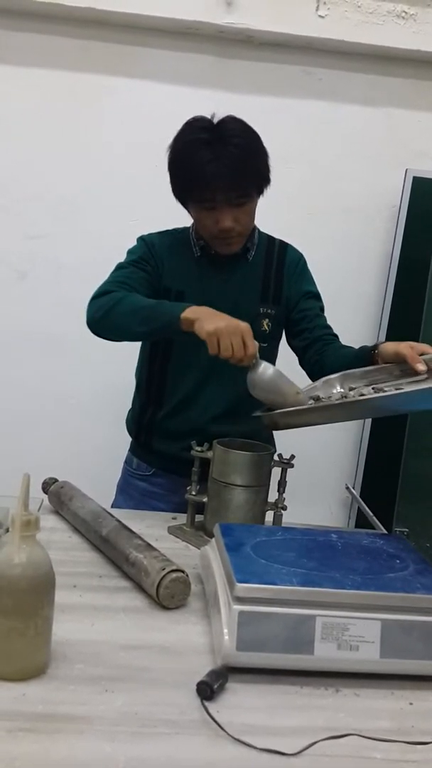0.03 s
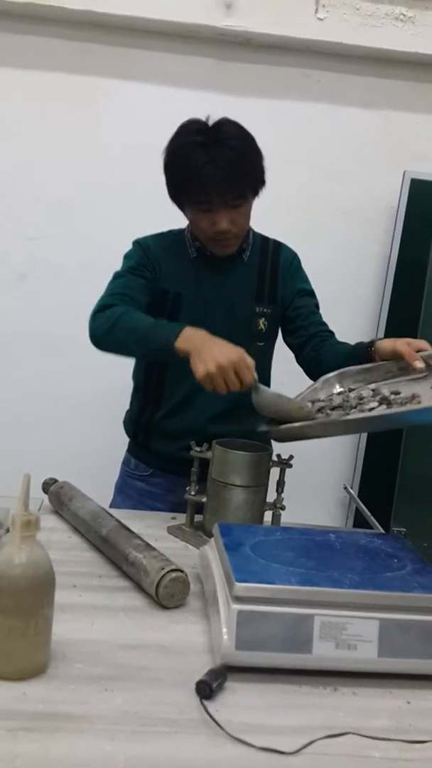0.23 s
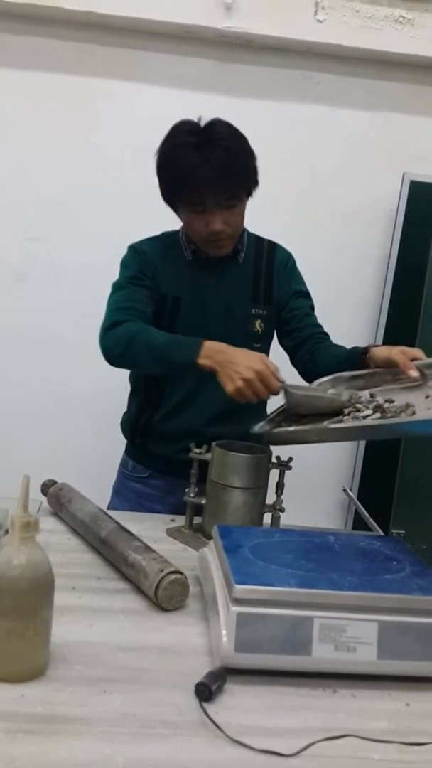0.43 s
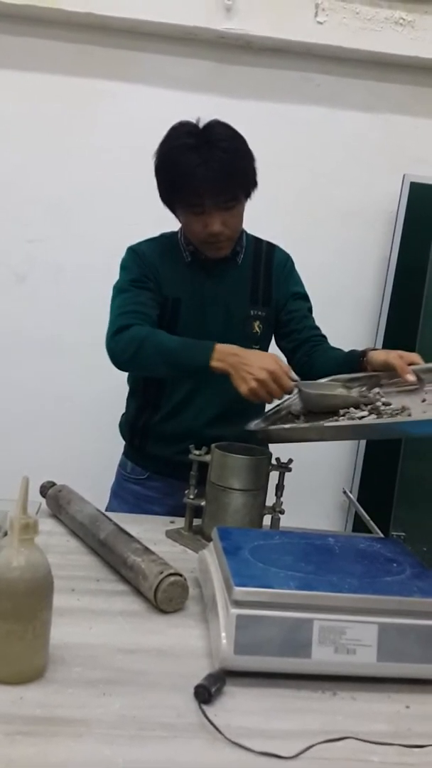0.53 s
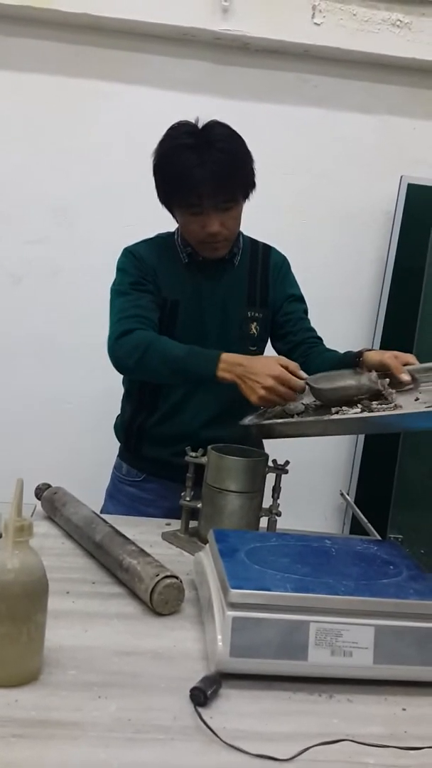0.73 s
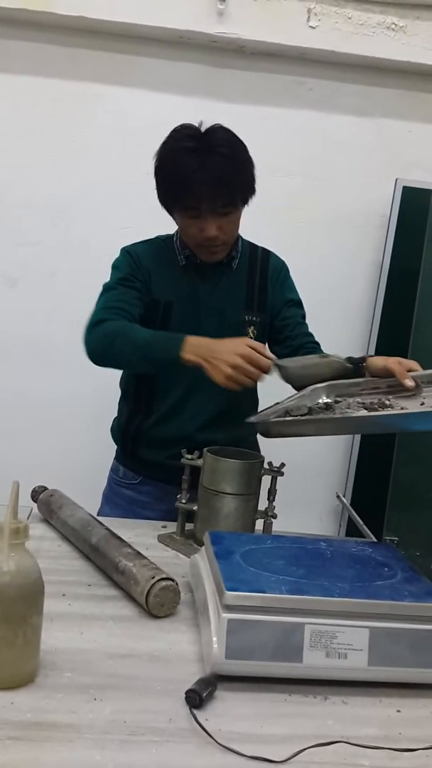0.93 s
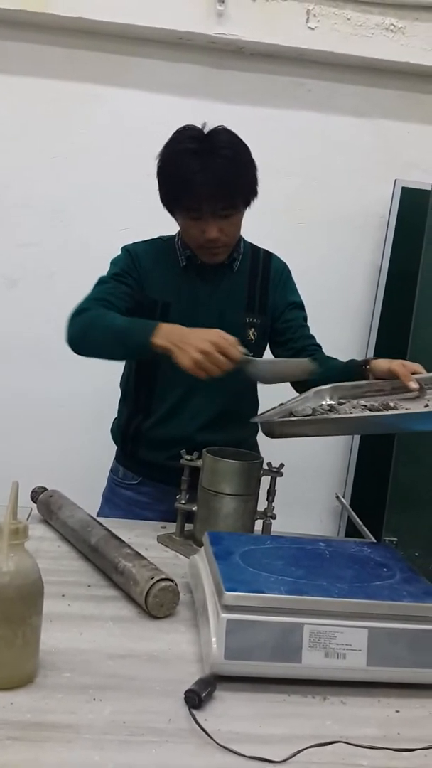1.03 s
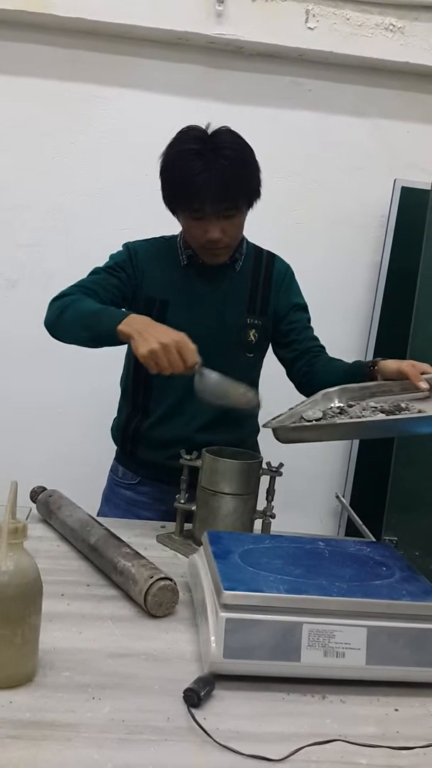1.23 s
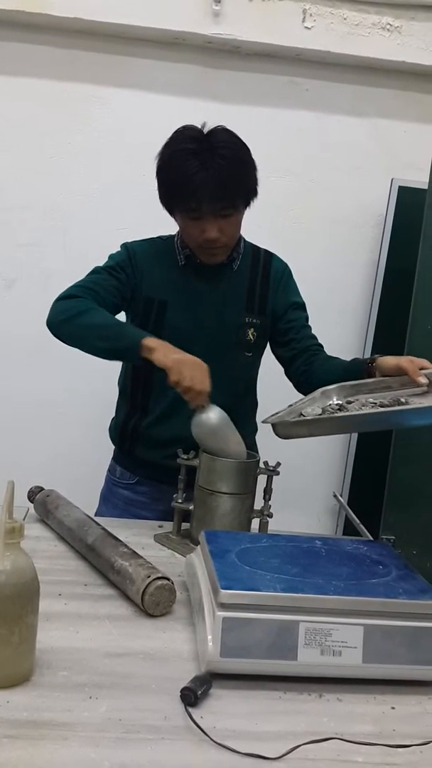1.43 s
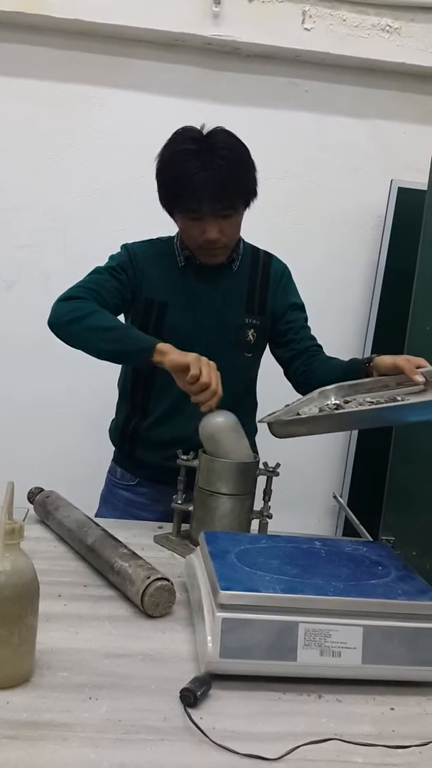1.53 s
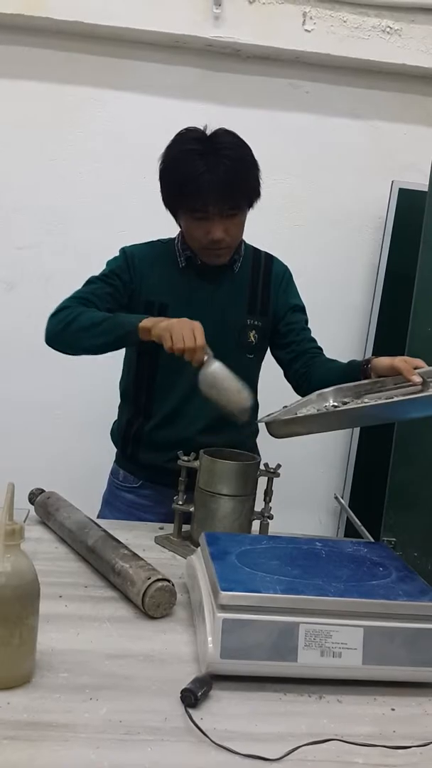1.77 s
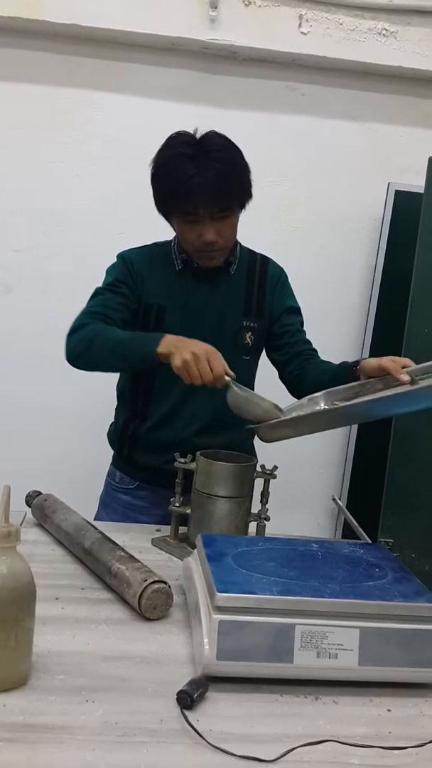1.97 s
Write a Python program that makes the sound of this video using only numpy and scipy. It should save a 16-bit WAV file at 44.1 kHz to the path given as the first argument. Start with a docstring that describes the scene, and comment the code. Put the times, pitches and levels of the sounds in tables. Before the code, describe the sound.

A metal scoop scrapes through gritty soil on a sheet-metal tray, clinking against pebbles. It then taps a steel mold and knocks on it, leaving a brief ring as soil patters in. The bare room echoes and ventilation hums faintly.

```python
"""A bare, ringing laboratory: a metal scoop is pushed through gritty soil on a sheet-metal tray.
Grinding grit and clinking pebbles excite the blade's resonances, and the tray rumbles under the load.
The scoop taps the rim of a steel mould, then knocks on it, leaving its modes ringing as soil
patters in. Ventilation hums faintly."""
import sys
import numpy as np
from scipy import signal
from scipy.fft import rfft, irfft
from scipy.io import wavfile

SR = 44100
rng = np.random.default_rng(int(sys.argv[2]) if len(sys.argv) > 2 else 0)


def store_pcm(level_fs):
    """Save levels as 16-bit WAV."""
    pcm = np.round(np.clip(level_fs, -1, 1) * 32767).astype(np.int16)
    wavfile.write(sys.argv[1], SR, np.atleast_2d(pcm).T)


N = 88200
T = np.arange(N) / SR
HZ = np.maximum(np.arange(N // 2 + 1) * SR / N, 1)
KNOCK_S, RISE_S = 1.616, 0.00062


def scoop():
    """Grinding and clinks ring the blade; the shifting load of soil detunes its resonances."""
    # Each row: time in seconds, grinding level in dB.
    grind_db = [(0, -65.5), (.2, -39), (.345, -58), (.365, -38.5), (.42, -36), (.475, -28.5), (.572, -33),
                (.607, -25.5), (.68, -34), (.76, -33), (.83, -39), (.94, -42.5), (1.04, -40.5),
                (1.13, -41.5), (1.3, -55.5), (1.42, -62), (1.55, -49), (2, -66)]
    # Each row: frequency in Hz, grit level in dB.
    grit_spectrum = [(200, -35), (700, -9), (1400, -6.5), (3000, 0.5), (5000, 2.5), (7000, 2.5), (9500, -5),
                     (12000, -18), (16000, -14)]
    # Hits on pebbles, tray and rim. Each row: start in seconds, level in dB, decay in seconds,
    # low and high edge in Hz.
    clinks = [(0.0814, -27, 0.0033, 1180, 11100), (.18, -34.5, 0.012, 3000, 9900),
              (0.2159, -19.5, 0.0045, 2530, 9600), (0.232, -30, 0.0072, 670, 8000),
              (.407, -34, 0.0044, 2500, 9700), (0.438, -35.5, 0.012, 1500, 3000),
              (0.457, -30, 0.0049, 2480, 13000), (0.48, -38.5, 0.003, 1040, 1460),
              (0.495, -23, 0.0024, 4030, 12000), (.547, -22, 0.003, 970, 9300),
              (0.568, -29, 0.0027, 2000, 8000), (0.5845, -18.5, 0.005, 2600, 10100),
              (.591, -20, 0.0065, 2280, 8000), (0.648, -18, 0.0095, 2200, 9400),
              (0.654, -14.5, 0.0048, 1750, 8100), (0.687, -18, 0.0051, 3460, 7850),
              (.711, -13.5, 0.0043, 2190, 9100), (0.72, -18.5, 0.0062, 1470, 7240),
              (0.734, -17.5, 0.0077, 2900, 8100), (.749, -20.5, 0.01, 1000, 5800),
              (.787, -24.5, 0.0056, 1990, 7860), (.9345, -22, 0.0011, 1380, 5500),
              (0.9616, -13, 0.002, 3100, 8000), (1.0052, -11, 0.00085, 3800, 10000),
              (1.024, -25, 0.0044, 3340, 8100), (1.0305, -17, 0.0037, 4200, 6750),
              (1.054, -22, 0.0045, 4100, 9300), (1.3554, -16, 0.0031, 2480, 9700),
              (1.425, -21.5, 0.0029, 5300, 15950), (1.7083, -24, 0.0038, 3850, 7800),
              (1.76, -35, 0.0019, 3500, 9100), (1.856, -43, 0.0011, 3860, 6600)]
    # Each row: frequency in Hz, gain in dB, T60 in seconds.
    blade_modes = [(1304, 5, 0.016), (1808, 6.5, 0.26), (2775, -13.5, 0.11), (4600, -0.5, 0.062),
                   (4835, -4, 0.042), (6690, 6.5, 0.021), (7100, 5.5, 0.033), (9750, 7, 0.042)]
    crunch_db, detune_share = 4.4, 0.013
    catch_and_slip = from_db(crunch_db * waver(per_s=70))
    grind = level(grind_db) * rms_one(catch_and_slip * colour(grains(), grit_spectrum))
    drive = grind + from_db(0.5) * sum(contact(*row) for row in clinks)
    ring = sum(from_db(db) * resonate(drive, hz * (1 + detune_share * waver(per_s=22)), t60_s)
               for hz, db, t60_s in blade_modes)
    return drive + ring


def pings():
    """The blade rings briefly where it catches a pebble or bounces on the rim."""
    # Each row: start in seconds, frequency in Hz, level in dB, T60 in seconds.
    catches = [(0.215, 4360, -17.5, 0.022), (0.218, 4850, -13.5, 0.017), (.439, 1365, -32.5, .07),
               (.466, 2810, -34, 0.14), (.483, 6040, -13.5, 0.025), (.509, 4665, -18, 0.029),
               (.689, 6100, -24, 0.02), (1.71, 3350, -25.5, 0.032)]
    return sum(modes(start_s, [mode]) for start_s, *mode in catches)


def sand():
    """Fine sand crackles as the blade digs in."""
    return from_db(-37.5) * swell(peak_s=0.506, spread_s=0.046) * rms_one(band(grains(), 6000, 17000))


def blade_song():
    """The blade sings as it first rubs the tray."""
    # Each row: frequency in Hz, level in dB.
    partials = [(1341, -41), (2870, -45), (4560, -43.5)]
    t60_s = 0.46
    return modes(0, [(hz, db, t60_s) for hz, db in partials])


def tray():
    """The sheet rattles under the load; at first the blade rubs it bare."""
    # Each row: time in seconds, rattle level in dB.
    rumble_db = [(0, -89), (.22, -58), (.237, -36.5), (.27, -59), (.5, -51.5), (.66, -36.5), (.75, -33.5),
                 (.82, -36.5), (.92, -54), (1.05, -45.5), (1.2, -54), (2, -88)]
    # Each row of both: frequency in Hz, level in dB.
    rumble_spectrum = [(50, -37), (130, -6), (250, -3.5), (420, 1), (800, -2.5), (1300, -4.5),
                       (2500, -12.5), (8000, -51)]
    rub_spectrum = [(200, -25), (800, -9), (1330, 5), (1900, -4), (2600, 3.5), (3400, -14.5), (4560, -9.5),
                    (6000, -14), (14000, -49)]
    rub_db, rub_decay_s = -36.5, 0.12
    rumble = level(rumble_db) * colour(grains(), rumble_spectrum)
    rub = from_db(rub_db) * np.exp(-T / rub_decay_s) * colour(grains(), rub_spectrum)
    return rumble + rub


def bump():
    """The scoop drops onto the tray."""
    # Each row: frequency in Hz, level in dB, T60 in seconds.
    bump_modes = [(400, -40.5, 0.13), (740, -38, 0.23)]
    return modes(0.232, bump_modes)


def rim_tap():
    """The scoop's side taps the mould's rim."""
    # Each row: frequency in Hz, level in dB, T60 in seconds.
    tap_modes = [(4390, -12.5, 0.014), (5390, -10.5, 0.029), (6850, -20, 0.023)]
    return modes(1.3562, tap_modes)


def knock():
    """The blow on the mould: squeak, quickly damped thud, crack and grit."""
    # Each row: frequency in Hz, level in dB, T60 in seconds.
    thud_modes = [(234, -26, 0.046), (352, -20.5, 0.069), (394, -24, 0.08), (512, -27.5, 0.062),
                  (675, -21.5, 0.027), (1210, -30, 0.054), (1853, -14, 0.027), (2600, -22, 0.015)]
    # Crack and grit. Each row: delay in seconds, level in dB, decay in seconds, low and high edge in Hz.
    bursts = [(0, -17.5, 0.0013, 1380, 2900), (.002, -27.5, 0.015, 2200, 7800)]
    thud = sum((-1) ** k * modes(KNOCK_S, [mode]) for k, mode in enumerate(thud_modes))
    return squeak() + thud + sum(contact(KNOCK_S + delay_s, *burst) for delay_s, *burst in bursts)


def squeak():
    """The blade sticks and slips on the rim just after the blow: a falling tone with its octave."""
    delay_s, rise_s, decay_s = 0.0014, 0.00065, 0.0038
    end_hz, fall_hz = 6540, 237.5
    t = np.maximum(T - KNOCK_S - delay_s, 0)
    force = np.exp(-t / decay_s)
    phase = 2 * np.pi * np.cumsum(end_hz + fall_hz * force) / SR
    tone = np.sin(phase) + from_db(-27) * force * np.sin(2 * phase)
    attack = 1 - np.exp(-(t / rise_s) ** 2)
    return from_db(-3.5) * attack * force * tone


def mould():
    """Each mode of the steel cylinder beats with a weaker twin; the loosely clamped wall rattles."""
    # Each row: frequency in Hz, level in dB, T60 in seconds.
    wall_modes = [(178.2, -41.5, 2), (295, -35, 0.37), (338, -39, 1), (1150, -35, 0.61), (1843, -43.5, 1.4),
                  (2730, -29.5, 0.55), (3340, -56, 0.3), (3835, -31, 0.31), (4556, -33, 0.35),
                  (6740, -50, 0.28)]
    split_hz, twin_db, rattle_db = 20.5, -7, 5.5
    ring = 0
    for hz, db, t60_s in wall_modes:
        twin_hz = hz + split_hz * rng.uniform(-1.08, 1)
        pair = modes(KNOCK_S, [(hz, db, t60_s), (twin_hz, db + twin_db, t60_s)])
        ring = ring + pair * rms_one(from_db(rattle_db * waver(per_s=130)))
    return ring


def pour():
    """After the knock, soil slides off the scoop and patters dully into the mould."""
    # Each row: frequency in Hz, level in dB.
    crumb_spectrum = [(60, -24), (170, -5), (250, -9), (340, 2.5), (450, -8.5), (700, -12.5), (2500, -18),
                      (8000, -33.5)]
    flow = swell(peak_s=1.683, spread_s=0.16) * (T > KNOCK_S)
    return from_db(-42.5) * flow * colour(grains(), crumb_spectrum)


def direct(x):
    """Straight path: the treble is louder on the right and differs in phase between the sides."""
    scatter_rad, scatter_width_hz, treble_pan_db = 1, 531, -3
    phase = scatter_rad * wander(len(HZ), HZ[-1] / scatter_width_hz) * HZ / (HZ + 900)
    side_db = treble_pan_db * HZ / (HZ + 600)
    left = from_db(side_db) * np.exp(1j * phase)
    return irfft(rfft(x) * np.array([left, 1 / left]), N)


def laboratory(x):
    """Early reflections, and a tail that dies sooner in the treble."""
    # Each row: frequency in Hz, tail level in dB, T60 in seconds.
    room_bands = [(100, 5.5, 1.44), (298, -0.5, 1.67), (990, -1, 1.22), (2400, -2, 1.26), (4950, -6, 0.58),
                  (7860, -4.5, 0.4), (15000, -6, 0.23)]
    early_rise_s, early_decay_s, tail_rise_s = 0.0016, 0.023, 0.028
    noise, tail = rfft(diffuse()), 0
    centres_hz = np.geomspace(60, 16000, 14)
    for hz, share in zip(centres_hz, np.eye(len(centres_hz))):
        part = irfft(noise * np.interp(np.log(HZ), np.log(centres_hz), share), N)
        fade = np.exp(-np.log(1000) * T / at_hz(room_bands, hz, column=2))
        fade *= np.minimum(T / tail_rise_s, 1)
        tail = tail + from_db(at_hz(room_bands, hz)) * part * rms_one(fade)
    early_fade = np.exp(-T / early_decay_s) * np.minimum(T / early_rise_s, 1)
    early = from_db(-6) * rms_one(diffuse() * early_fade)
    response = pan(left_db=-1) * (early + tail) / np.sqrt(N)
    return signal.fftconvolve(x[None], response, axes=1)[:, :N]


def ventilation():
    """A soft rush of air with a wavering hum."""
    # Each row: frequency in Hz, level in dB.
    air_spectrum = [(25, -11), (42, -0.5), (55, -8), (100, 0), (170, 3), (260, -1.5), (600, -9.5),
                    (1500, -10.5), (5000, -20), (15000, -26)]
    hum_hz, width_hz = 166, 7
    peak = 1 / (1 + (2 * (HZ - hum_hz) / width_hz) ** 2)
    hum = rms_one(irfft(rfft(rng.standard_normal(N)) * peak, N))
    return from_db(-50.5) * colour(diffuse(), air_spectrum) + from_db(-55) * hum


def diffuse():
    """White stereo noise, alike in the bass and unrelated in the treble."""
    # Each row: frequency in Hz, left-right correlation from 0 to 1.
    coherence = [(60, 1), (180, 0.95), (350, 0.85), (700, 0.24), (1500, 0), (15000, 0)]
    mid, side = rfft(rng.standard_normal((2, N)))
    alike = at_hz(coherence, HZ)
    return irfft(np.sqrt((1 + alike) / 2) * mid + np.sqrt((1 - alike) / 2) * side * [[1], [-1]], N)


def contact(start_s, db, decay_s, low_hz, high_hz):
    """One gritty contact: a burst of tiny fractures with a weaker, wider crack."""
    t = T[:6000]
    shape = np.minimum(t / RISE_S, 1) * np.exp(-np.maximum(t - 2 * RISE_S, 0) / decay_s)
    noise = rng.standard_normal(len(t)) * shape
    burst = band(noise, low_hz, high_hz) + from_db(-15.5) * band(noise, 0.36 * low_hz, 19200)
    burst = rms_one(burst) * np.sqrt(np.mean(shape ** 2)) * from_db(db)
    return np.pad(burst, (int(start_s * SR), N))[:N]


def grains(per_s=2000, spread_db=3):
    """Random clicks of uneven size."""
    hits = rng.random(N) < per_s / SR
    sizes = from_db(spread_db * np.minimum(rng.exponential(1, N), 4))
    return hits * sizes * rng.choice([-1, 1], N)


def modes(start_s, rows):
    """Decaying sines struck at one moment."""
    t = np.maximum(T - start_s, 0)
    ring = sum(from_db(db) * np.exp(-np.log(1000) * t / t60_s) * np.cos(2 * np.pi * hz * t)
               for hz, db, t60_s in rows)
    return np.minimum(t / RISE_S, 1) * ring


def resonate(x, hz, t60_s):
    """A resonance of unit peak gain whose pitch may move."""
    pole = np.exp(-np.log(1000) / (t60_s * SR))
    carrier = np.exp(2j * np.pi * np.cumsum(hz) / SR)
    return 2 * np.real(carrier * signal.lfilter([1 - pole], [1, -pole], x / carrier + 1e-18))


def band(x, low_hz, high_hz):
    """Causal band-pass."""
    return signal.sosfilt(signal.butter(2, [low_hz, high_hz], "band", fs=SR, output="sos"), x + 1e-18)


def colour(x, spectrum):
    """Give a steady signal a spectrum; unit power."""
    return rms_one(irfft(rfft(x) * from_db(at_hz(spectrum, HZ)), N))


def at_hz(rows, hz, column=1):
    """Interpolate a column over log frequency."""
    rows = np.array(rows)
    return np.interp(np.log(hz), np.log(rows[:, 0]), rows[:, column])


def wander(size, segments):
    """A random zigzag of spread about 1."""
    knots = rng.standard_normal(2000)
    return np.interp(np.linspace(0, segments, size), np.arange(len(knots)), knots)


def waver(per_s):
    """A random zigzag over time."""
    return wander(N, per_s * N / SR)


def swell(peak_s, spread_s):
    """Gaussian envelope."""
    return np.exp(-((T - peak_s) / spread_s) ** 2 / 2)


def level(curve):
    """Gain over time from points in seconds and dB."""
    return from_db(np.interp(T, *np.transpose(curve)))


def pan(left_db):
    """Opposite left and right gains."""
    return from_db([[left_db], [-left_db]])


def from_db(db):
    """Decibels to gain."""
    return 10 ** (np.asarray(db) / 20)


def rms_one(x):
    """Scale to unit power."""
    return x / np.sqrt(np.mean(x ** 2) + 1e-20)


def scene():
    """Scoop, tray and mould, direct and through the room, over the ventilation."""
    # The bench favours the right in the low treble.
    # Each row: frequency in Hz, dB added left and taken from the right.
    balance = [(150, 0.5), (500, 1.5), (1200, 0.5), (2300, -0.2), (5000, -2), (8000, 3), (14000, 1)]
    digging = scoop() + pings() + sand() + tray() + pour()
    tap, blow, ring = rim_tap(), knock(), mould()
    tones = blade_song() + bump()
    near = direct(digging + tones + blow + ring) + pan(left_db=-0.5) * direct(tap)
    far = laboratory(digging + from_db(-3) * tap + from_db(-2) * blow + from_db(-3.5) * (ring + tones))
    side_gains = from_db(at_hz(balance, HZ) * [[1], [-1]])
    return irfft(rfft(near + far) * side_gains, N) + ventilation()


def record(dry):
    """Cut the deepest bass, clip at full scale, cut the top."""
    low_cut_hz, high_cut_hz = 40, 15400
    thin = signal.sosfilt(signal.butter(2, low_cut_hz, "high", fs=SR, output="sos"), dry)
    low_pass = signal.ellip(10, .1, 70, high_cut_hz, fs=SR, output="sos")
    return signal.sosfilt(low_pass, np.clip(thin, -1, 1))


dry = scene()
out = record(dry)
store_pcm(out)
```